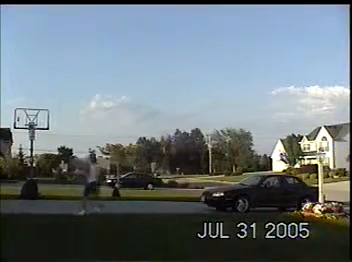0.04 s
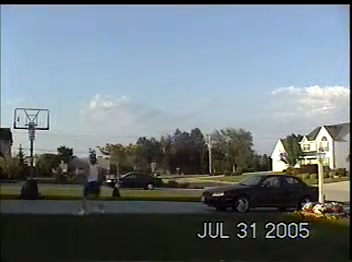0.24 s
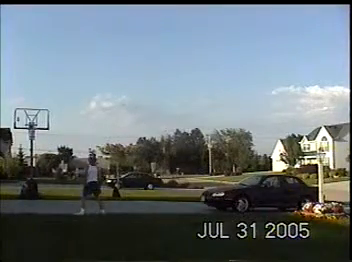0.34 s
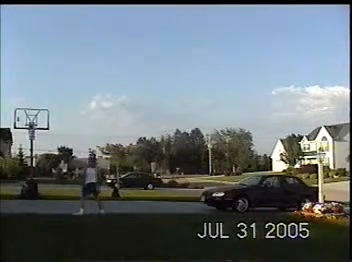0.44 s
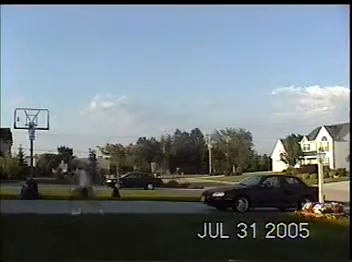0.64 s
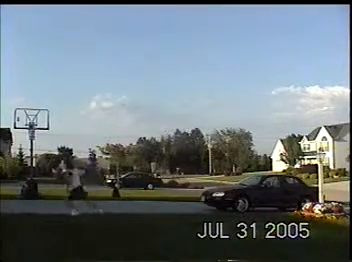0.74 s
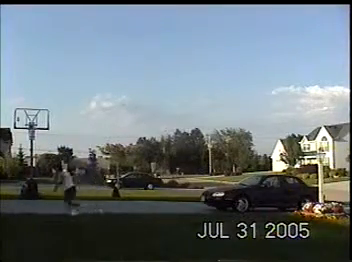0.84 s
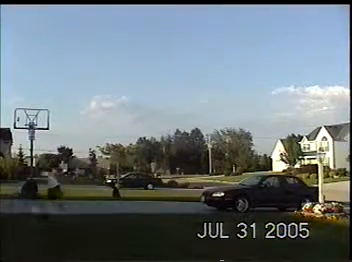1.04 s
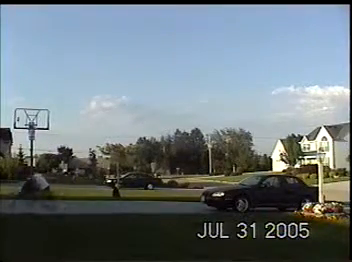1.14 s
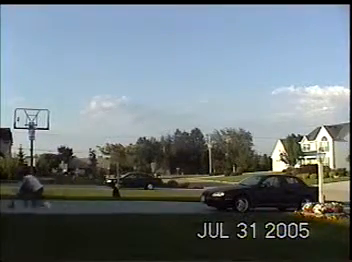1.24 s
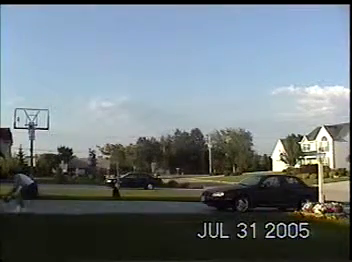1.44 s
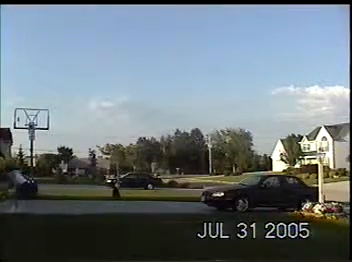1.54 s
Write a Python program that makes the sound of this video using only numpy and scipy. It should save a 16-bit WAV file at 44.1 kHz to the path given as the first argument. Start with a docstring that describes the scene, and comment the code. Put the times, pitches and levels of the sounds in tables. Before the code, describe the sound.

A basketball hits a backboard with a loud bang, the rim rattling, then drops onto pavement.

```python
"""A suburban driveway. A basketball bangs into the hoop: the board booms and shakes against its mount,
loose fittings clink and the rim rattles. The ball drops onto the pavement once, then shoes scuff and
tap after it. Small birds chirp over quiet air, and house and trees scatter a short echo.
All of this is on the left channel; a faint mains hum and hiss lie on both."""
import sys
import numpy as np
from scipy import signal
from scipy.io import wavfile
from scipy.ndimage import uniform_filter1d

SR = 44100
rng = np.random.default_rng(int(sys.argv[2]) if len(sys.argv) > 2 else 0)


def materialize(psi):
    """Save the field psi as 16-bit PCM at rate SR to the path in sys.argv[1].

    A 1-D psi becomes a single channel; in a 2-D psi each row is a channel.
    """
    bounded = np.clip(np.atleast_2d(psi).T, -1, 1)
    quanta = np.round(bounded * 32767).astype(np.int16)
    wavfile.write(sys.argv[1], SR, quanta)


N = 70560
T = np.arange(N) / SR

# The board is hit and knocks on its mount. Each row: start in seconds, then body, clatter, crack in dB.
BOARD_BLOWS = [(0.2372, -44, -26.5, -24), (0.2453, -42.5, -31, -24), (0.2544, -40.5, -25.5, -26),
               (.2640, -37, -24, -30), (0.2906, -35, -26, -38), (0.3044, -30.5, -22.5, -29.5),
               (0.3243, -35, -50, -55), (0.3444, -49, -33.5, -36.5), (0.3657, -37, -34.5, -40),
               (0.404, -59, -34, -41)]
# The body of board and pole. Each row: pitch in Hz, level in dB, t60 in seconds.
BOARD_MODES = [(151, -14.5, 0.76), (718, -15, 0.4), (237.85, 3.5, 0.34), (276, -6.5, 0.44), (317, -1, 0.4),
               (375, -7.5, 0.12), (404, -6, 0.1), (543.5, -5.5, 0.19), (598, -12.5, 0.26), (677, -19, 0.35),
               (850, -16, 0.67), (954, -17, 0.27), (1214, -9.5, 0.27)]
# The panel's clatter. Each row: frequency in Hz, relative level in dB per Hz, t60 in seconds.
PANEL_CLATTER = [(50.7, -43, 0.47), (139, 1, 0.63), (290, 4.5, 0.3), (597, 2.5, 0.22), (910, 1, 0.28),
                 (1490, -15, 0.49), (2940, -25.5, 0.4), (4600, -26.5, 0.26), (7530, -21, 0.35),
                 (15000, -50, 0.51)]
# The crack of metal on metal. Each row: frequency in Hz, relative level in dB per Hz, t60 in seconds.
METAL_CRACK = [(200, -4, 0.031), (1570, 9.5, 0.048), (2960, 4.5, 0.059), (4160, -6, 0.056),
               (7240, -3.5, 0.08), (10500, -7.5, 0.051), (14900, -15.5, 0.043)]


def backboard():
    """The whole board flexes in one low boom; each blow rings its modes, clatters and cracks."""
    starts, body_db, clatter_db, crack_db = np.transpose(BOARD_BLOWS)
    boom_start_s, boom_hz, rise_s, fall_s = 0.238, 128, 0.014, 0.019
    age = np.maximum(T - boom_start_s, 0)
    flex = np.minimum(age / rise_s, 1) * np.exp(-np.maximum(age - rise_s, 0) / fall_s)
    boom = from_db(-21.5) * flex * np.sin(2 * np.pi * boom_hz * age)
    body = 0
    for hz, db, t60 in BOARD_MODES:
        spread_db = rng.normal(0, 1, len(starts))
        body += ring(clicks(starts, body_db + db + spread_db), hz, t60)
    clatter = dense_ring(clicks(starts, clatter_db), PANEL_CLATTER)
    crack = dense_ring(clicks(starts, crack_db), METAL_CRACK)
    return boom + body + clatter + crack


# Bright ticks on top of the bang. Each row: start in seconds, level in dB, pitch in Hz.
FITTING_CLINKS = [(0.2462, -22.5, 8350), (.2490, -22.5, 10400), (0.2573, -19, 7050), (0.269, -24, 7500),
                  (0.2975, -29, 10500), (0.385, -37, 6530)]


def fittings():
    """Loose fittings clink, each with one high mode that dies at once."""
    return sum(ring(clicks(start, db), hz, t60=0.0064) for start, db, hz in FITTING_CLINKS)


# The rattle after the bang. Each row: start in seconds, level in dB.
RIM_KNOCKS = [(0.4558, -44.5), (0.4824, -37), (.495, -44.5), (.512, -40), (0.535, -56), (0.556, -42.5),
              (0.616, -47.5), (0.696, -52)]
# The rim's metallic wash. Each row: frequency in Hz, relative level in dB per Hz, t60 in seconds.
RIM_WASH = [(70, -21, 0.81), (194, 0.5, 0.49), (1120, -1, 0.49), (2140, -1, 0.26), (4030, -16.5, 0.2),
            (8030, -18.5, 0.23), (15100, -44, 0.15)]
# The rim's clear tones. Each row: pitch in Hz, level in dB, t60 in seconds.
RIM_MODES = [(438.5, -4.5, 0.26), (1748, -2, 0.073)]


def rim():
    """The rim swings back and rattles; each knock rings a dense wash and two tones."""
    knocks = clicks(*np.transpose(RIM_KNOCKS))
    tones = sum(from_db(db) * ring(knocks, hz, t60) for hz, db, t60 in RIM_MODES)
    return dense_ring(knocks, RIM_WASH) + tones


# Ball and shoes land. Each row: start in seconds, slap level in dB, slap's opening pitch in Hz,
# slap t60 in seconds, grit level in dB, thump level in dB.
GROUND_HITS = [(0.837, -21, 3090, 0.016, -28, -23.5), (1.3992, -33, 840, 0.0053, -62, -44.5),
               (1.4137, -28, 7040, 0.0094, -33, -39.5), (1.5267, -33.5, 1396, 0.026, -37, -41.5),
               (1.5451, -35, 2680, 0.019, -33, -57)]
# The pavement's crunch. Each row: frequency in Hz, relative level in dB per Hz, t60 in seconds.
GRIT_CRUNCH = [(120, -10, 0.043), (1020, 3, 0.047), (2750, 4.5, 0.021), (3760, -4, 0.018),
               (5000, 0.5, 0.022), (8640, -14.5, 0.025), (15000, -15, 0.013)]


def pavement_hits():
    """Each contact is a gritty slap, falling in pitch as the contact spreads, then a soft thump."""
    glide_s, thump_lag_s = 0.0099, 0.00317
    slaps = thumps = grit = 0
    for start, slap_db, slap_hz, t60, grit_db, thump_db in GROUND_HITS:
        age = np.maximum(T - start, 0)
        cycles = slap_hz * glide_s * np.log1p(age / glide_s)
        slaps += from_db(slap_db - 60 * age / t60) * np.sin(2 * np.pi * cycles)
        thumps += ring(clicks(start + thump_lag_s, thump_db), hz=230, t60=0.032)
        grit += clicks(start, grit_db)
    return slaps + thumps + dense_ring(grit, GRIT_CRUNCH)


# Slides around the steps. Each row: peak time in seconds, half width in seconds, level in dB.
SHOE_SCUFFS = [(1.403, 0.014, -54), (1.453, 0.015, -52), (1.592, 0.016, -50.5)]
# The colour of a sliding sole. Each row: frequency in Hz, relative level in dB per Hz.
SOLE_COLOUR = [(200, 8), (1200, -6.5), (6500, -1), (10000, 2.5), (15000, -32)]


def scuffs():
    """Soles slide on the pavement in brief swells of noise."""
    sliding = sum(from_db(db) * swell(peak, half) for peak, half, db in SHOE_SCUFFS)
    return sliding * noise(SOLE_COLOUR)


def bird_note(start, length, first_hz, middle_hz, last_hz, db):
    """A bird whistles an arc through three pitches, wavering a little."""
    warble_hz = 45
    progress = np.clip((T - start) / length, 0, 1)
    waver = uniform_filter1d(rng.standard_normal(N), size=60)
    glide = first_hz + (last_hz - first_hz) * progress
    arc = 2 * (2 * middle_hz - first_hz - last_hz) * progress * (1 - progress)
    hz = glide + arc + warble_hz * waver / waver.std()
    return from_db(db) * arch(start, length) * np.sin(2 * np.pi * np.cumsum(hz) / SR)


# Near birds. Each row: start and length in seconds, first, middle and last pitch in Hz, level in dB.
BIRD_CHIRPS = [(0.0, 0.0202, 5100, 4300, 3300, -47.5), (1.328, 0.0335, 4000, 4180, 3850, -58),
               (0.017, 0.0192, 3400, 4300, 3260, -43), (0.067, 0.02, 3400, 4300, 3760, -50),
               (0.028, 0.05, 3200, 3490, 4300, -50.5), (0.058, .028, 3500, 4250, 4750, -45),
               (.089, 0.0126, 4600, 4600, 3370, -43), (0.927, 0.021, 5800, 6010, 5830, -41.5),
               (.945, 0.015, 5940, 6110, 5630, -42)]


def birds():
    """Near chirps, a far trill of falling notes and blurred twittering in the trees."""
    chirps = sum(bird_note(*row) for row in BIRD_CHIRPS)
    trill_start_s, trill_length_s, note_s = 0.78, 0.49, 0.021
    starts = np.arange(trill_start_s, trill_start_s + trill_length_s, note_s)
    trill = sum(bird_note(start, note_s, 7800, 7500, 7200, db=-60) for start in starts)
    trill *= np.sqrt(arch(trill_start_s, trill_length_s))
    blur = butterworth(rng.standard_normal(N), [5870, 6440], "band")
    twitter = from_db(-60.5) * swell(peak_s=0.994, half_width_s=0.085) * blur / blur.std()
    return chirps + trill + twitter


# The yard's echo tail. Each row: frequency in Hz, relative level in dB per Hz, t60 in seconds.
YARD_TAIL = [(100, -1, 0.27), (1960, -2, 0.32), (15100, -4.5, 0.037)]


def yard_echo(send):
    """House and trees scatter a short, dull echo that begins 12 ms late."""
    response = dense_ring(clicks(0.012, db=0), YARD_TAIL)
    return signal.fftconvolve(send, response / np.linalg.norm(response))[:N]


# The outdoor bed. Each row: frequency in Hz, relative level in dB per Hz.
AIR_COLOUR = [(25, 5), (80, -5.5), (150, -6), (400, -4.5), (700, -9), (1100, -4), (2300, -14), (5000, -18),
              (8000, -20), (16000, -31)]


def air():
    """Quiet outdoor air: steady noise, weighted to the lows."""
    return from_db(-53) * noise(AIR_COLOUR)


def mains_hum():
    """The mains hums in nine harmonics, each weaker than the last."""
    hum_hz, first_db, step_db = 122, -62.5, 6.5
    return sum(from_db(first_db - step_db * k) * np.sin(2 * np.pi * ((k + 1) * hum_hz * T + phase))
               for k, phase in enumerate(rng.random(size=9)))


# The noise floor. Each row: frequency in Hz, relative level in dB per Hz.
HISS_COLOUR = [(28, -1), (300, -30), (1000, -41), (15000, -50)]


def hiss():
    """The electronics' own noise: a faint rumble with a thin hiss above it."""
    return from_db(-75) * noise(HISS_COLOUR)


def from_db(db):
    """Decibels to gain."""
    return 10 ** (np.asarray(db) / 20)


def butterworth(x, hz, kind):
    """A gentle filter with its corners at hz."""
    return signal.sosfilt(signal.butter(2, hz, kind, fs=SR, output="sos"), x)


def at_hz(table, hz, column=1):
    """Read a column of a table along log frequency."""
    table = np.array(table)
    return np.interp(np.log(hz), np.log(table[:, 0]), table[:, column])


def bands(table):
    """Noise bands (centre Hz, samples) shaped by a spectrum; together their rms is about 1."""
    edges = np.geomspace(20, 17000, 25)
    centres = np.sqrt(edges[1:] * edges[:-1])
    gains = from_db(at_hz(table, centres)) * np.sqrt(np.diff(edges))
    white = rng.standard_normal((2, N + SR // 4))
    for k, gain in enumerate(gains / np.linalg.norm(gains)):
        band = butterworth(white[k % 2], edges[k:k + 2], "band")[-N:]
        yield centres[k], gain * band / band.std()


def noise(table):
    """Steady coloured noise."""
    return sum(band for hz, band in bands(table))


def clicks(times, db):
    """One click at each time."""
    out = np.zeros(N)
    samples = np.round(np.atleast_1d(times) * SR).astype(int)
    np.add.at(out, np.clip(samples, 0, N - 1), from_db(db))
    return out


def ring(x, hz, t60):
    """A mode: a unit click starts a dying sine of height 1."""
    radius, angle = from_db(-60 / (t60 * SR)), 2 * np.pi * hz / SR
    return signal.lfilter([0, np.sin(angle)], [1, -2 * radius * np.cos(angle), radius ** 2], x + 1e-18)


def dense_ring(hits, table):
    """Countless close modes: each hit adds energy to every band, which dies at its own rate."""
    out = 0
    for hz, band in bands(table):
        retained = from_db(-120 / (at_hz(table, hz, column=2) * SR))
        energy = signal.lfilter([1], [1, -retained], hits ** 2 + 1e-18)
        out += band * np.sqrt(energy)
    return out


def swell(peak_s, half_width_s):
    """A bell-shaped envelope."""
    return np.exp(-.5 * ((T - peak_s) / half_width_s) ** 2)


def arch(start, length):
    """A half-sine envelope."""
    return np.abs(np.sin(np.pi * np.clip((T - start) / length, 0, 1)))


def scene():
    """Play, birds and their echo, with the lows cut, over the air; all on the left channel."""
    low_cut_hz, gain_db = 97, 5.5
    bed = air()
    play = backboard() + fittings() + rim() + scuffs() + pavement_hits()
    song = birds()
    echo = yard_echo(from_db(-18) * play + from_db(-9) * song)
    foreground = butterworth(play + song + echo, low_cut_hz, "high")
    return np.array([from_db(gain_db) * (bed + foreground), np.zeros(N)])


def record(dry):
    """Mains hum and hiss enter both channels; the top is cut steeply."""
    cutoff_hz = 15300
    high_cut = signal.ellip(10, .3, 80, cutoff_hz, fs=SR, output="sos")
    return signal.sosfilt(high_cut, dry + mains_hum() + hiss())


dry = scene()
out = record(dry)
materialize(out)
```